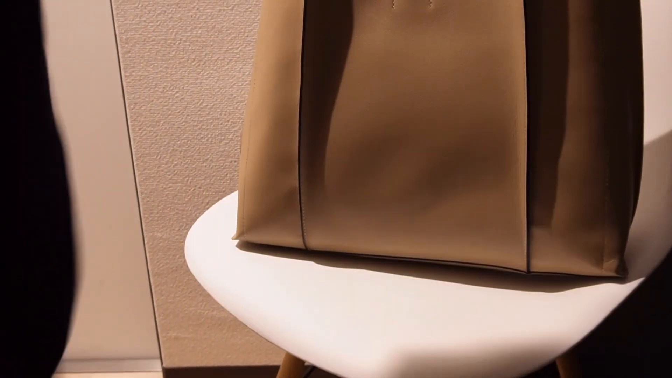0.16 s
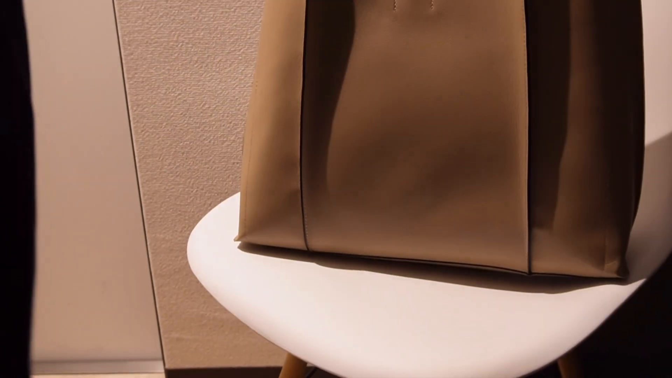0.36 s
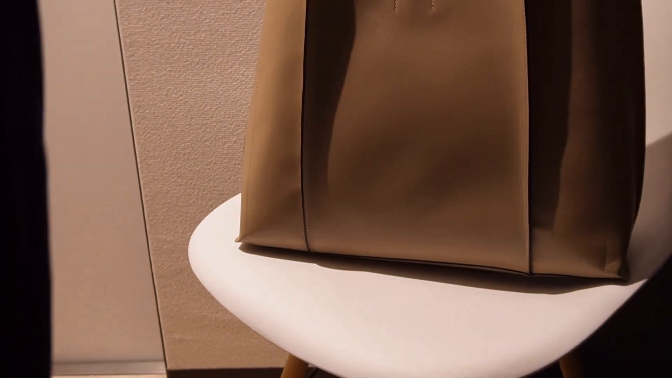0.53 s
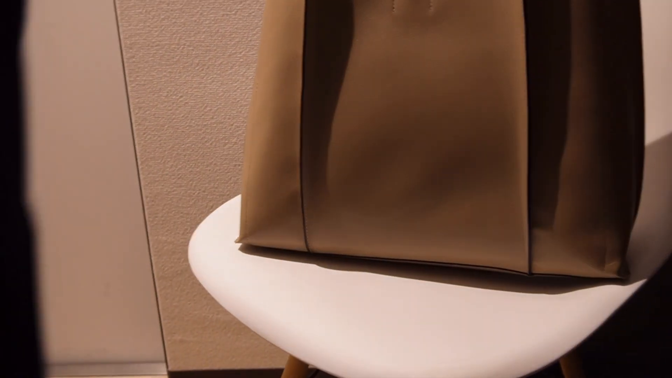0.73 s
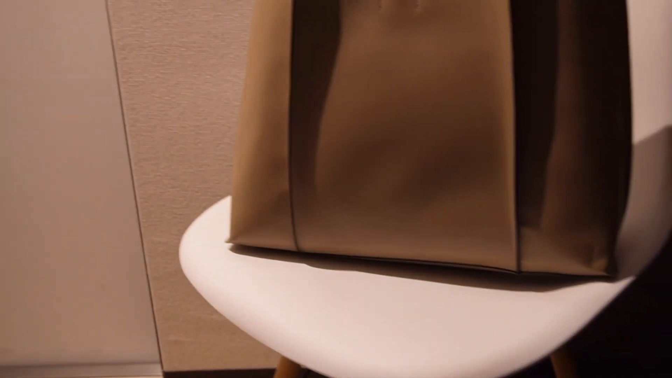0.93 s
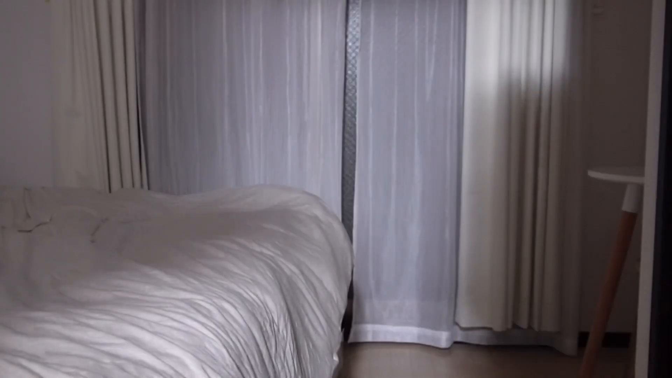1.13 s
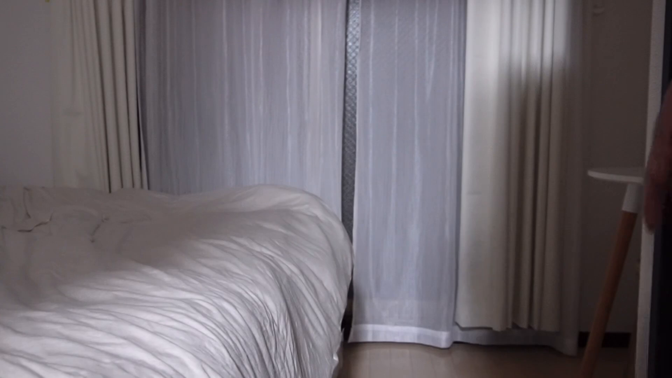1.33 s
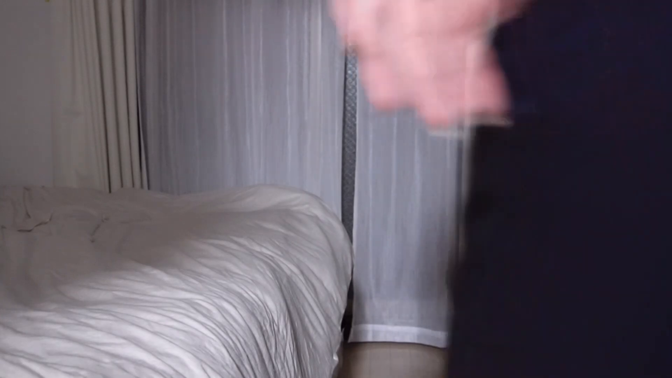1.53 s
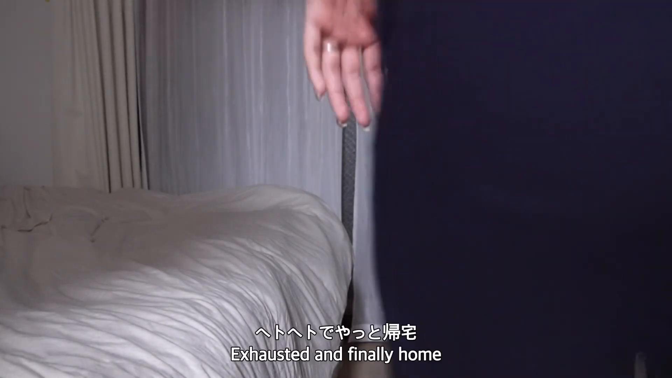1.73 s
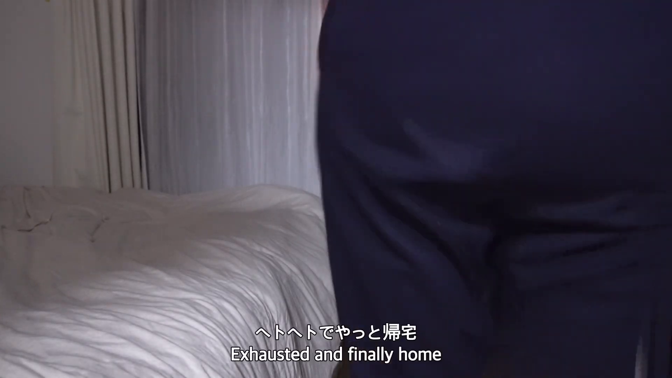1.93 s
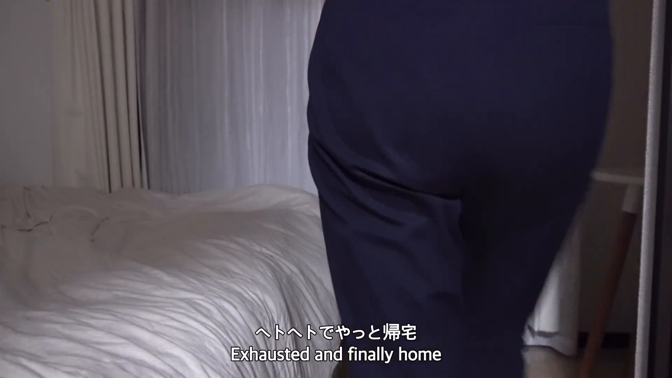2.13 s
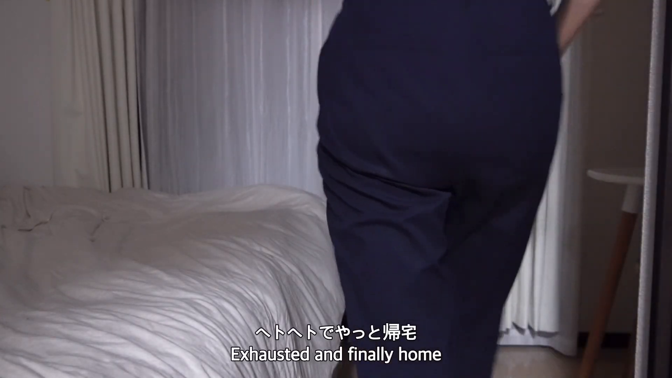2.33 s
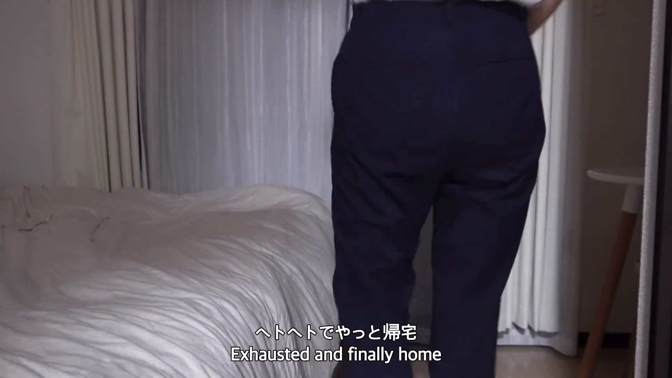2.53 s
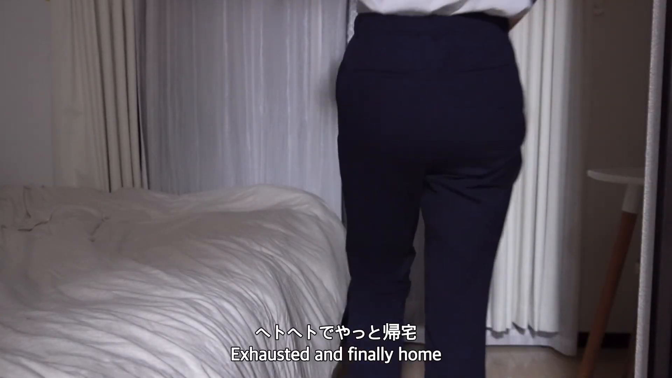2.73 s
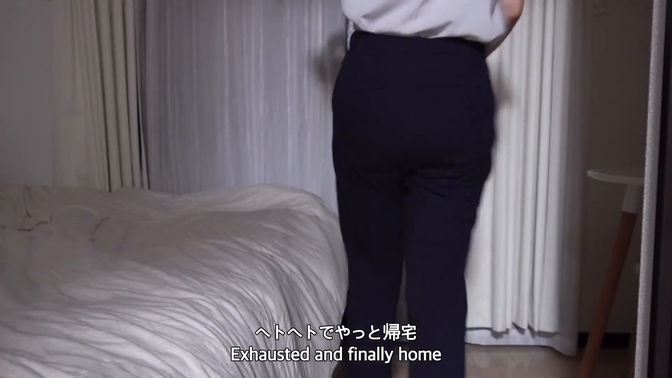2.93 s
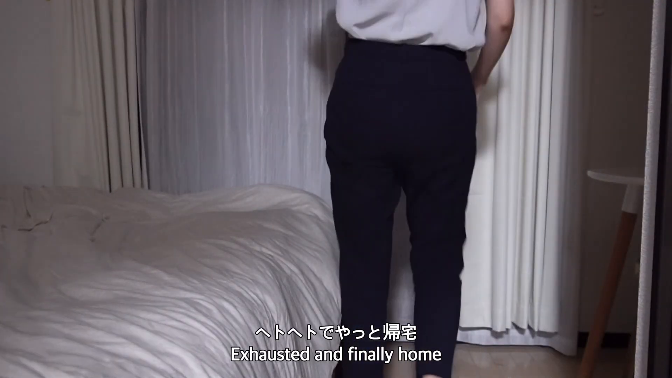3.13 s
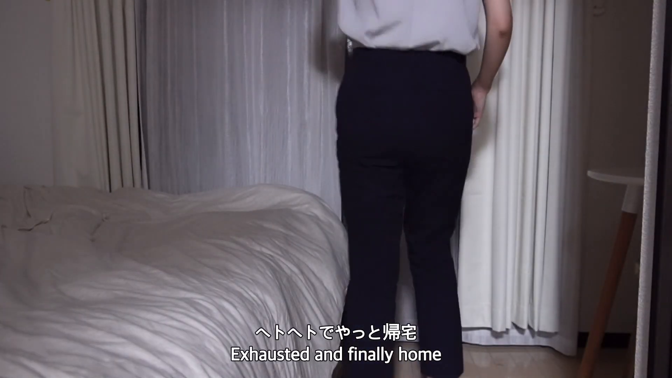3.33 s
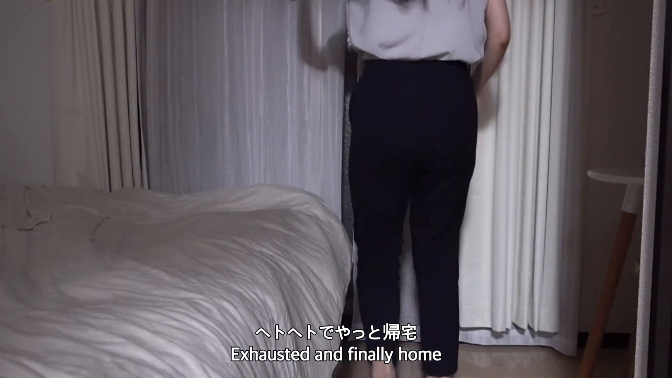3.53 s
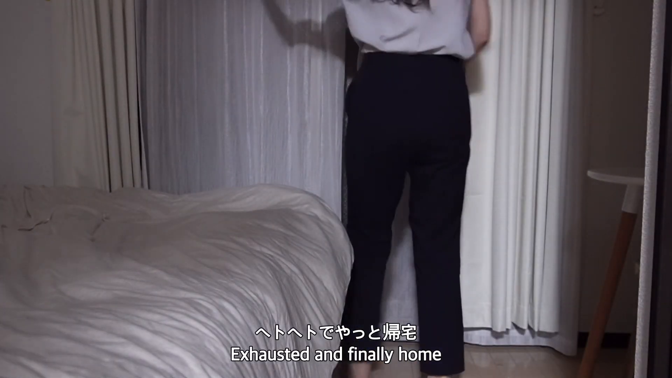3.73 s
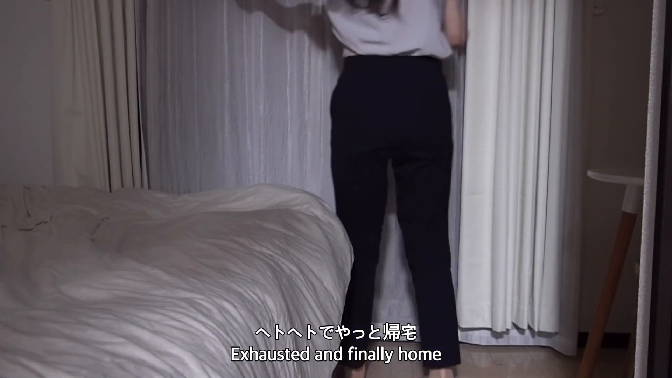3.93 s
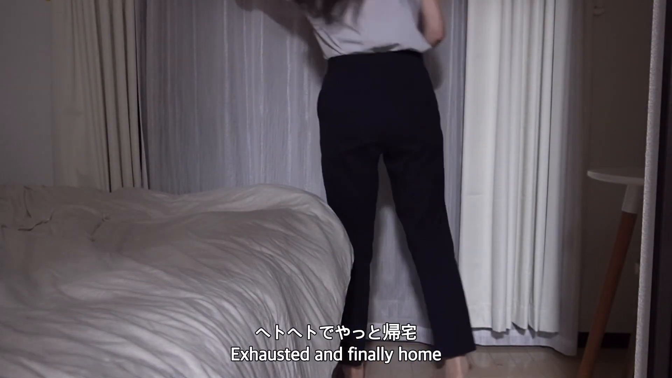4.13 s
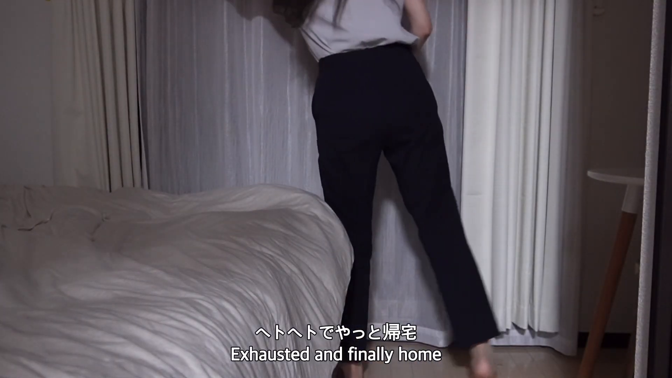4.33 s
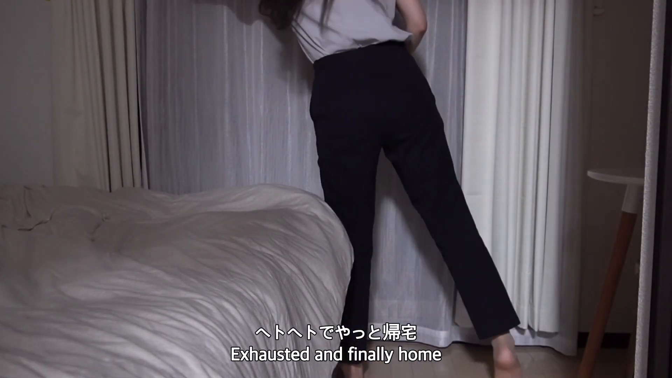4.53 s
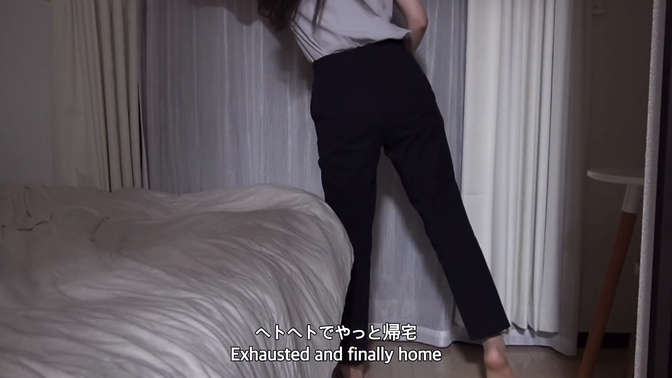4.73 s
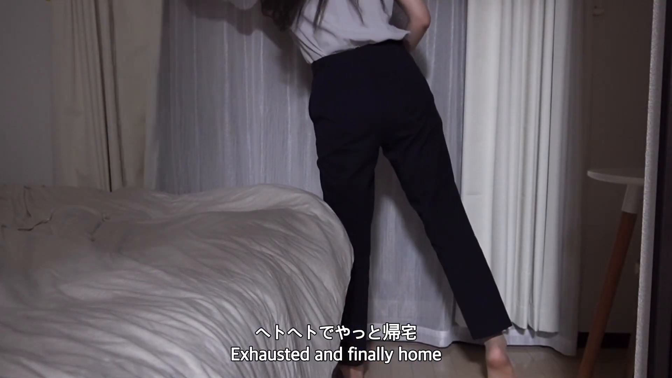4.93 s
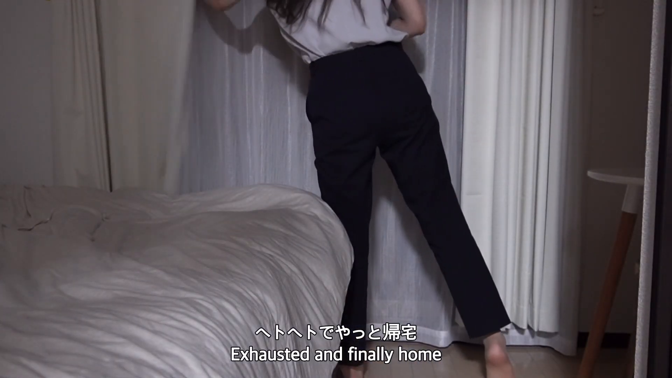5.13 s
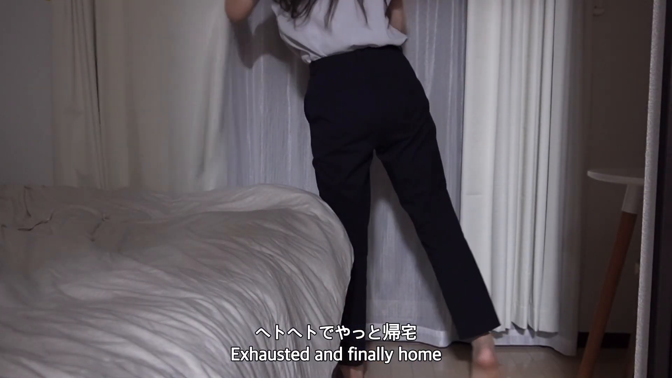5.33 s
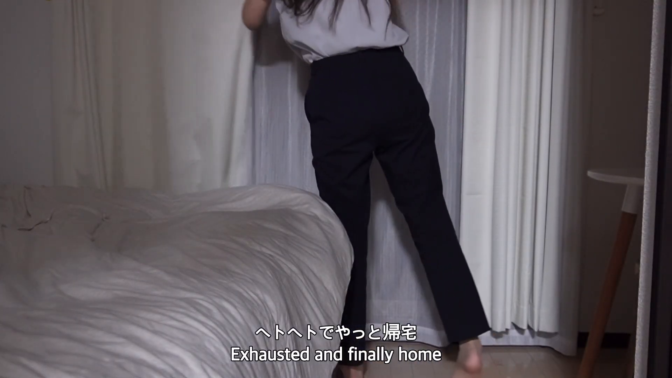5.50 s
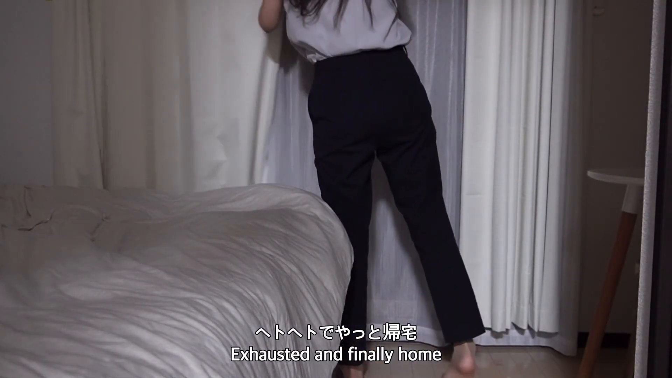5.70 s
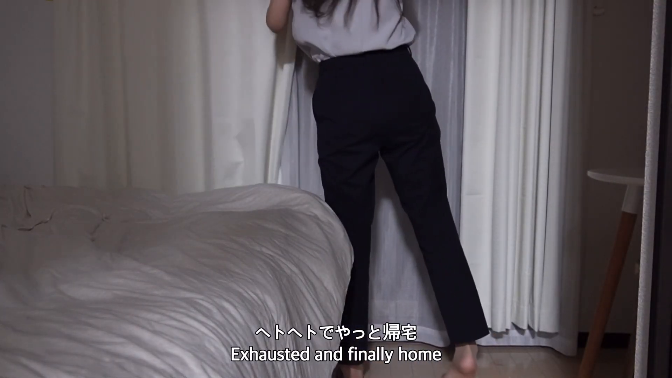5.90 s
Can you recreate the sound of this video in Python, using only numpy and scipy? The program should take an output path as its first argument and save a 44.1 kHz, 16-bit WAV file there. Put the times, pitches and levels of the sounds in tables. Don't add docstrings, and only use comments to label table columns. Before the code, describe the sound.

A quiet, dry bedroom heard closely in stereo, sources ahead and slightly left, over faint house rumble, room air and hiss. From 0 to 1 s there are thin cloth brushes, small ticks at 0.2 and 0.4, a sharper one at 0.5, and a soft rub near 0.8. Padded knocks cluster around 1.0 as the scene changes abruptly. Fuller fabric rustle follows, with a crisp tap at 1.57. Faint bare heels thud from 1.8 to 3.8 s; trousers swish, brightest near 2.85 and 3.35, with a small ringing bump at 2.26 and a tap at 3.76. It becomes nearly still, with slight rustles. At 4.83 a curtain starts with a tug and glider knocks, speeding into a bright metallic stuttering rush from about 5.0, a hard tug at 5.33, loudest around 5.3 to 5.5, then it grows duller and slows to a halt near 6.

```python
import sys
import numpy as np
from scipy import signal
from scipy.fft import rfft, irfft, next_fast_len
from scipy.io import wavfile

SR = 44100
rng = np.random.default_rng(int(sys.argv[2]) if len(sys.argv) > 2 else 0)


def unload_audio(sound):
    columns = np.transpose(np.atleast_2d(sound))
    steps = np.round(np.clip(columns, -1, 1) * 32767)
    wavfile.write(sys.argv[1], SR, steps.astype(np.int16))


def gain_from_decibels(decibels):
    exponent = np.asarray(decibels, float) / 20
    return 10 ** exponent


N = 267246

CHANGE_S, FADE_S = 1.0535, 0.014

# pitch_hz, level_db (per Hz)
HUSH_COLOUR = [(20, -30), (30, -15), (60, 1), (100, 0.5), (200, 0), (330, -4.5), (520, -7), (760, -7.5),
               (1200, -8), (2500, -10.5), (5000, -14.5), (8000, -23), (11000, -30), (15500, -30)]
# pitch_hz, width_hz, level_db
AIR_HANDLING = [(132, 19, -0.5), (237, 97, 1), (558, 81, -2.5)]
# pitch_hz, likeness (0 to 1)
HUSH_LIKENESS = [(60, 1), (180, 0.86), (550, 0.78), (1650, 0.5), (4970, 0.61), (15000, 0.19)]
RUMBLE_DB, AIR_DB = (-69.5, -69), (-72, -68.5)
# peak_s, rumble_db, air_db, rise_s, fall_s (over 20 dB)
GUSTS = [
    (.85, -67, -78, .6, .4),
    (1.19, -75, -62, .3, .5),
    (2.25, -71, -72, .6, .5),
    (3.4, -71, -71, .6, 1.2),
    (5.3, -67, -69, .5, .6),
    (5.72, -72, -59, .9, 1.1),
]

# pitch_hz, shared_db, opposed_db (between the microphones)
ECHO_COLOUR = [(300, -12, -18), (1500, -12, -17), (3000, -10.5, -13.5), (5840, -11.5, -8),
               (10300, -5.5, -4.5), (15000, -19, -1.5)]
ROOM_T60_S = 0.19

# start_s, peak_db, pitch_hz
HEELS = [
    (1.772, -58, 127),
    (1.82, -54, 75),
    (2.379, -55, 220),
    (2.799, -58, 258),
    (3.324, -54.5, 181),
    (3.748, -58, 116),
    (3.818, -52, 136),
]

# start_s, peak_db, centre_hz, width_octaves, t60_s
TICKS = [(.161, -46.5, 3912, 0.61, 0.11), (.402, -49.5, 2000, 1.5, 0.056), (0.5153, -38, 4000, 0.4, 0.02),
         (.516, -43.5, 2600, 0.7, 0.021), (.5155, -66, 9000, 2.1, 0.015), (0.5156, -50, 1500, 2.1, .025),
         (1.012, -48, 5500, 1.7, 0.062), (1.031, -43, 4500, 0.8, 0.028), (1.566, -35.5, 3940, 1.8, 0.025),
         (1.576, -51, 7000, 0.91, 0.024), (3.09, -54, 6960, 0.63, .05), (3.756, -40, 2300, 1.93, 0.35),
         (3.756, -47.5, 500, 3.2, 0.31), (3.757, -71, 9000, 1.4, 0.11)]
# start_s, peak_db, centre_hz, width_octaves, t60_s
BUMPS = [(.42, -58, 2500, 1.5, .06), (1.003, -41.5, 676, 0.27, .07), (1.004, -45, 357, 0.34, 0.093),
         (1.002, -41, 1700, 1.1, .06), (1.033, -49, 420, 0.51, 0.072), (1.03, -40, 1040, 0.6, 0.04),
         (1.032, -42, 1700, .55, 0.036), (1.054, -45, 3000, 1.6, .15), (2.256, -41.5, 1710, 0.31, 0.067),
         (2.257, -46, 2570, 0.25, 0.36), (2.257, -45, 4650, 0.37, 0.42), (2.251, -47.5, 6600, 0.23, 0.46),
         (2.261, -51.5, 4860, 1.8, 0.38), (2.254, -49, 600, 1.2, .1), (2.385, -49.5, 2010, 1.2, 0.13),
         (2.388, -54.5, 474, 0.59, 0.17), (2.95, -52, 526, 0.46, .08), (3.769, -47, 2500, 1.74, 0.28),
         (3.92, -57.5, 1390, 1.6, 0.29)]
# start_s, peak_db, centre_hz, width_octaves
BOARDS = [
    (1.775, -55, 400, 2.1),
    (2.8, -55, 450, 0.72),
    (3.04, -57, 279, 0.99),
    (3.33, -54, 350, 1.6),
]
BOARD_T60_S = 0.39
TICK_RISE_MS, BUMP_RISE_MS, BOARD_RISE_MS = 0.8, 2.7, 3.7

# peak_s, level_db, rise_s, fall_s (over 20 dB), fibre_pitch_octaves (above 1 kHz)
STROKES = [(.071, -50, .111, .096, 2.73), (.23, -62.4, .9, .33, .39), (.452, -72, .03, .04, -.4),
           (.786, -47.7, .153, .162, .15), (.978, -60.3, .12, .074, .07), (1.092, -43.3, .045, .24, 1.4),
           (1.192, -42.5, .09, .52, .75), (1.335, -47, .06, .26, .8), (1.56, -43.5, .17, .07, 1.55),
           (1.694, -57.1, .093, .166, 2.8), (1.99, -53, .57, .21, .64), (2.29, -53.2, .197, .53, .7),
           (2.539, -56.4, .12, .222, .77), (2.762, -61.9, .041, .79, .54), (2.853, -42, .105, .122, 2.1),
           (3.024, -54.7, .113, .36, .93), (3.353, -41.4, .09, .111, 1.7), (3.49, -57.2, .19, .27, .96),
           (3.756, -63.5, .2, .3, 1.01), (4.118, -63.7, .109, .085, 1.74), (4.271, -73, .153, .087, 1.68),
           (4.646, -61.4, .05, .1, .57), (4.76, -63.8, .131, .124, -.4), (4.9, -53, .1, .2, -.3)]
WEAVE_BELOW_DB, WEAVE_ABOVE_DB = 12.0, 22.5
WEAVE_SPAN_DB = 34.9
WEAVE_TOP, TOP_FOLLOWS = 2.1, 0.15

# time_s, chatter_db
PULL = [
    (4.8, -72),
    (4.835, -50),
    (4.88, -48),
    (4.98, -36.5),
    (5.11, -32),
    (5.25, -33.8),
    (5.46, -28.5),
    (5.87, -38.5),
    (6.06, -49),
]
# peak_s, level_db
TUGS = [
    (4.828, -50),
    (5.329, -27),
]
TUG_RISE_S, TUG_FALL_S = 0.018, 0.09
# start_s, peak_db
KNOCKS = [(4.8256, -17), (4.9144, -41), (4.94, -13), (4.9804, -8.5), (5.0494, -12), (5.0908, -4),
          (5.3009, -22), (5.3255, -2), (5.3344, -21), (5.3604, -27), (5.4484, -37)]
# pitch_hz, level_db (per Hz)
RAIL_COLOUR = [(200, -25.5), (500, -23), (950, -16), (1500, -15), (2800, -7.5), (3600, -4), (4400, -2),
               (5700, -7.5), (7000, -12.5), (9500, -19.5), (9750, -9.5), (11800, -17), (13000, -22),
               (15500, -55)]
# pitch_hz, level_db (over the rail colour), ring_cycles
RAIL_RINGS = [(940, 9.5, 21), (3510, 4, 81), (4340, 4, 99), (5720, 9, 120.), (10060, 1, 190),
              (11870, 5, 320), (12750, 4, 300.)]
FULL_SPEED_DB = -33
BODY_DB, BODY_PER_DB, BODY_TUG = -3, 0.03, -1.1
EDGE_DB, EDGE_PER_DB, EDGE_TUG, EDGE_FADE_DB_PER_S = -3.5, 0.33, 0.6, 7.5
LOADED_S, LOAD_DB_PER_S = 5.12, 24.0


def in_time(rows):
    s, *columns = np.transpose(rows)
    return [np.interp(np.arange(N) / SR, s, c) for c in columns]


def at_hz(points, hz, column=1):
    points = np.array(points)
    return np.interp(np.log(hz + 1), np.log(points[:, 0]), points[:, column])


def rms_one(x):
    return x / np.sqrt(np.mean(x ** 2) + 1e-20)


def bandpass(x, order, low_hz, high_hz):
    return signal.sosfilt(signal.butter(order, [low_hz, high_hz], "band", fs=SR, output="sos"), x)


def drift(rate_hz):
    r = np.exp(-2 * np.pi * rate_hz / SR)
    return rms_one(signal.lfilter([1], [1, -2 * r, r * r], rng.standard_normal(N + SR))[SR:])


def swell(s, rise_s, fall_s):
    t = np.arange(0, N, 32) / SR - s
    rise = gain_from_decibels(np.minimum(-40 * t / rise_s, 200))
    fall = gain_from_decibels(np.minimum(40 * t / fall_s, 200))
    return np.repeat(2 / (rise + fall), 32)[:N]


def ring(clicks, hz, t60):
    r, w = gain_from_decibels(-60 / (t60 * SR)), 2 * np.pi * hz / SR
    return signal.lfilter([0, np.sin(w)], [1, -2 * r * np.cos(w), r * r], clicks + 1e-18)


def grains(pitches, colour_db, cycles, per_s, spread_db, clump_db, clump_rate, start=0):
    sizes = gain_from_decibels(spread_db * np.minimum(rng.exponential(1, N), 5)) * rng.choice([-1, 1], N)
    happens = rng.random(N) < per_s / SR
    slips = rms_one(sizes * happens * gain_from_decibels(clump_db * drift(clump_rate)))
    cycles = cycles * np.ones(len(pitches))
    per_ring = np.sqrt(4 * np.log(1000) * np.log(pitches[-1] / pitches[0]) / (SR * cycles))
    dealt = rng.integers(0, len(pitches), N)
    out = np.zeros(N)
    for k, hz in enumerate(pitches):
        i = start + np.flatnonzero((dealt == k)[start:] & (slips != 0)[start:])
        clicks = np.zeros(N - start)
        clicks[i - start] = slips[i] * gain_from_decibels(colour_db(k, i)) * hz * per_ring[k]
        rung = ring(clicks, hz, cycles[k] / hz)
        out[start:] += bandpass(rung, 1, 0.98 * hz, min(2.02 * hz, 0.45 * SR))
    return out


def hush():
    hz = np.arange(N // 2 + 1) * SR / N
    humps = sum(gain_from_decibels(db) / np.sqrt(1 + (2 * (hz - centre_hz) / width_hz) ** 4)
                for centre_hz, width_hz, db in AIR_HANDLING)
    colour = gain_from_decibels(at_hz(HUSH_COLOUR, hz)) * (0.45 + humps)
    mid, side = rfft(rng.standard_normal((2, N))) * colour
    alike = np.clip(at_hz(HUSH_LIKENESS, hz), 0, 0.99)
    pair = np.sqrt(1 + alike) * mid + np.sqrt(1 - alike) * side * np.array([[1], [-1]])
    bands = (hz < 340, (hz >= 340) & (hz < 800), hz >= 800)
    rumble, air, hiss = (rms_one(irfft(pair * band, N)) for band in bands)

    before, after = gain_from_decibels(2 * np.transpose([RUMBLE_DB, AIR_DB]))[:, :, None]
    still = np.where(np.arange(N) < CHANGE_S * SR, before, after)
    gusts = sum(gain_from_decibels(2 * np.array([[low_db], [mid_db]])) * swell(s, rise_s, fall_s)
                for s, low_db, mid_db, rise_s, fall_s in GUSTS)
    rumble_db, air_db = 10 * np.log10(still + gusts)
    rumble = rumble * gain_from_decibels(rumble_db + 2.1 * drift(4.1))
    air = air * gain_from_decibels(air_db + 0.5 + 0.99 * drift(3.0))
    return rumble + air + hiss * gain_from_decibels(-67.0)


def bedroom(x):
    t = np.arange(SR // 2) / SR
    tail = rng.standard_normal((2, len(t))) * gain_from_decibels(-60 * t / ROOM_T60_S) * (t > 0.003)
    tail = tail / np.sqrt(np.sum(tail[0] ** 2))
    size = next_fast_len(N + len(t))
    hz = np.arange(size // 2 + 1) * SR / size
    colour = gain_from_decibels(np.array([at_hz(ECHO_COLOUR, hz, column=1), at_hz(ECHO_COLOUR, hz, column=2)]))
    shared, opposed = irfft(rfft(x, size) * rfft(tail, size) * colour, size)[:, :N]
    return np.array([shared + opposed, shared - opposed])


def steps():
    out = np.zeros(N)
    for s, db, hz in HEELS:
        push = np.zeros(N)
        push[round(s * SR)] = gain_from_decibels(db - 3.5)
        out += ring(push, hz, 0.12)
    return signal.sosfilt(signal.butter(2, 450.0, fs=SR, output="sos"), out)


def taps():
    rows = [(*row, TICK_RISE_MS) for row in TICKS]
    rows += [(*row, BUMP_RISE_MS) for row in BUMPS]
    rows += [(*row, BOARD_T60_S, BOARD_RISE_MS) for row in BOARDS]
    out, t = np.zeros(N + SR), np.arange(SR // 2) / SR
    for s, db, hz, octaves, t60, rise_ms in rows:
        half = 2 ** (octaves / 2)
        noise = rng.standard_normal(len(t))
        body = rms_one(bandpass(noise, 2, hz / half, min(hz * half, 0.4 * SR)))
        rise = np.minimum(1000 * t / rise_ms, 1)
        at = round(s * SR)
        out[at:at + len(t)] += gain_from_decibels(db - 4.0 - 60 * t / t60) * body * rise
    return out[:N]


def cloth():
    pitches = np.geomspace(700, 15000, num=40)
    octaves = np.log2(pitches / 1000)
    motion = np.array([swell(s, rise_s, fall_s) for s, db, rise_s, fall_s, fibre in STROKES])
    db, fibre = np.array(STROKES).T[[1, 4], :, None]
    below = 1 + gain_from_decibels(2 * WEAVE_BELOW_DB * (fibre - octaves))
    above = 1 + gain_from_decibels(2 * WEAVE_ABOVE_DB * (octaves - WEAVE_TOP - TOP_FOLLOWS * fibre))
    colour = gain_from_decibels(2 * (db - WEAVE_SPAN_DB)) / below / above

    def all_strokes_db(k, i):
        return 10 * np.log10(colour[:, k] @ motion[:, i])

    return gain_from_decibels(-0.3) * grains(pitches, all_strokes_db, cycles=13.0, per_s=12000.0, spread_db=1.8,
                              clump_db=-0.2, clump_rate=40.0)


def knocks():
    blows = np.zeros(N)
    blows[[round(s * SR) for s, db in KNOCKS]] = gain_from_decibels(np.array(KNOCKS)[:, 1] - 20.5)
    burst = signal.lfilter([1], [1, -gain_from_decibels(-60 / (0.013 * SR))], blows + 1e-18)
    return signal.lfilter([0.012], [1, 0.012 - 1], burst)


def curtain():
    t = np.arange(N) / SR
    glide_db, = in_time(PULL)
    tugs = sum(gain_from_decibels(2 * db) * swell(s, TUG_RISE_S, TUG_FALL_S) for s, db in TUGS)
    chatter_db = 10 * np.log10(gain_from_decibels(2 * glide_db) + tugs)
    effort_db = 20 * np.log10(gain_from_decibels(chatter_db) + knocks())
    speed_db = np.maximum(glide_db - FULL_SPEED_DB, -16)
    tug_db = chatter_db - glide_db
    body_db = BODY_DB + BODY_PER_DB * speed_db + BODY_TUG * tug_db + 7.0
    edge_db = EDGE_DB + EDGE_PER_DB * speed_db + EDGE_TUG * tug_db + 6.0
    edge_db = edge_db - EDGE_FADE_DB_PER_S * (t - PULL[0][0])
    load_db = LOAD_DB_PER_S * np.minimum(t - LOADED_S, 0)

    dense_hz = np.geomspace(220, 15200, num=200) * gain_from_decibels(rng.normal(0, 0.036, 200))
    ring_hz, ring_db, ring_cycles = np.transpose(RAIL_RINGS)
    modes_hz = np.insert(dense_hz, 1, ring_hz)
    cycles = np.insert(np.maximum(45.0, 0.012 * dense_hz), 1, ring_cycles)
    rail_db = at_hz(RAIL_COLOUR, modes_hz) + np.insert(0 * dense_hz, 1, ring_db - 5.0) - 30.5
    body_share = np.clip(np.log2(3000 / modes_hz), 0, 1)
    deep_share = np.clip(np.log2(1100 / modes_hz), -0.7, 1) * (modes_hz < 2500)
    edge_share = np.interp(modes_hz, [6300.0, 9000.0, 10000.0, 11600.0], [0.0062, 0.71, 0.45, 1.5])

    def mode_db(k, i):
        shifts_db = body_share[k] * body_db[i] + deep_share[k] * load_db[i] + edge_share[k] * edge_db[i]
        return effort_db[i] + rail_db[k] + shifts_db

    return grains(modes_hz, mode_db, cycles=cycles, per_s=20000.0, spread_db=0.0, clump_db=-0.24,
                  clump_rate=76.0, start=round(PULL[0][0] * SR))


def scene():
    near = steps() + taps() + cloth() + curtain()
    direct = near * gain_from_decibels(np.array([[0.3], [-0.3]]))
    return hush() + bedroom(near) + direct


def top_cut(x):
    return signal.sosfilt(signal.butter(12, 15760, fs=SR, output="sos"), x)


def record(dry):
    before_s = CHANGE_S - np.arange(N) / SR
    fade = np.where(before_s > 0, np.clip(before_s / FADE_S, 0.05, 1), 1)
    return top_cut(dry * fade)


dry = scene()
out = record(dry)
unload_audio(out)
```